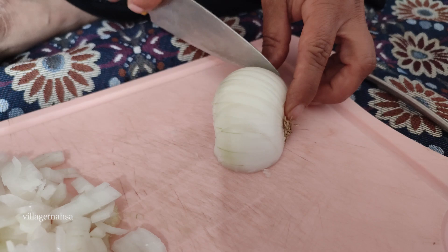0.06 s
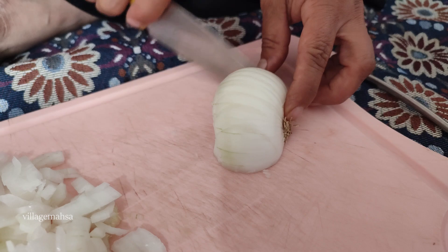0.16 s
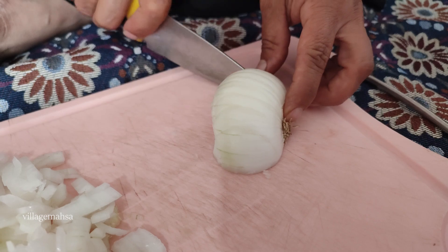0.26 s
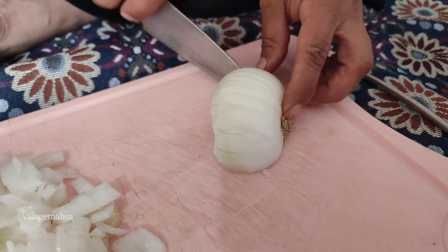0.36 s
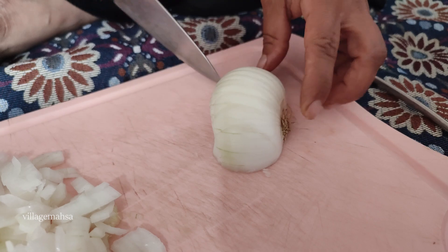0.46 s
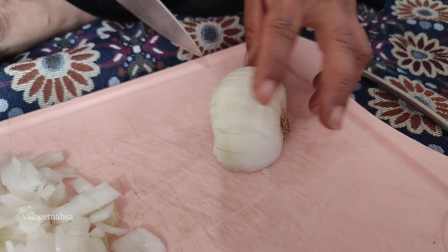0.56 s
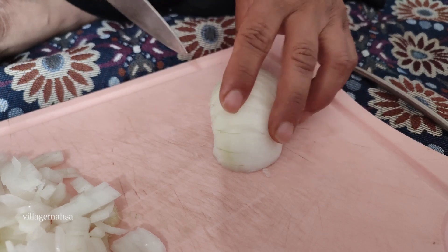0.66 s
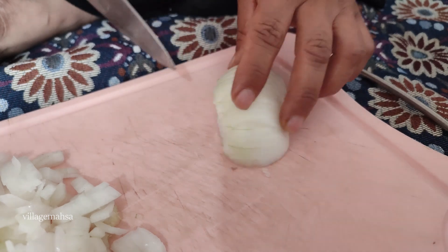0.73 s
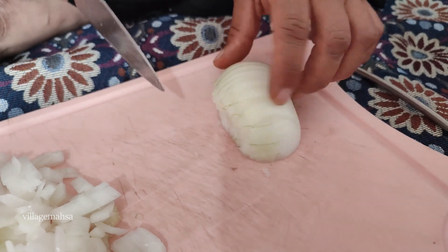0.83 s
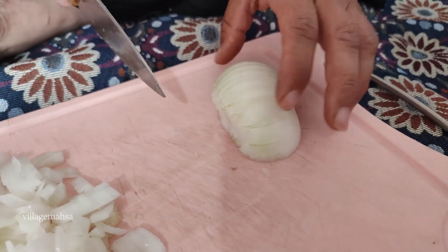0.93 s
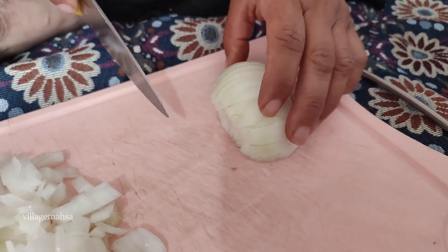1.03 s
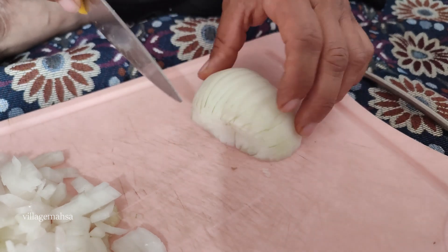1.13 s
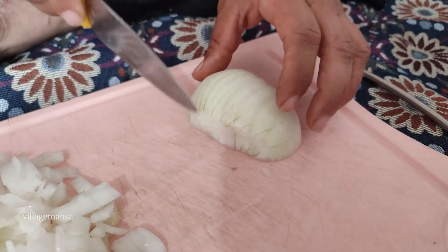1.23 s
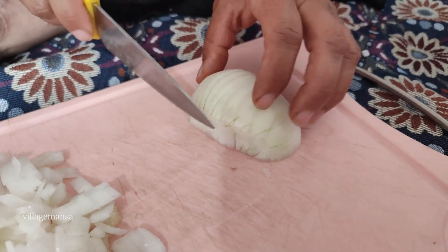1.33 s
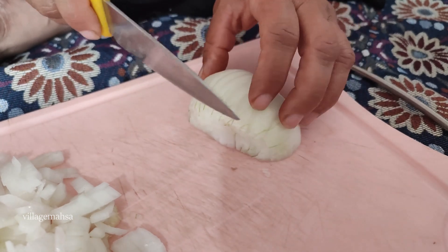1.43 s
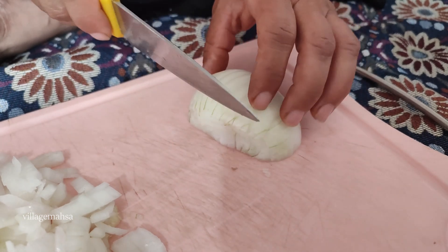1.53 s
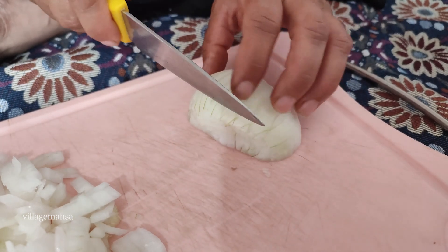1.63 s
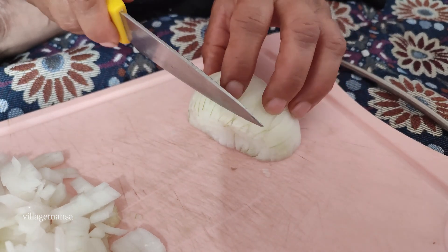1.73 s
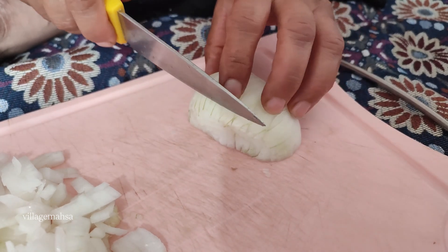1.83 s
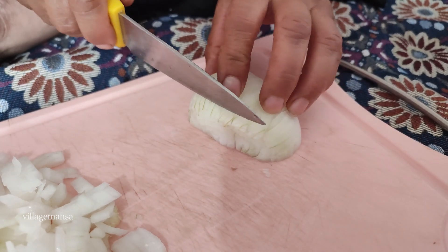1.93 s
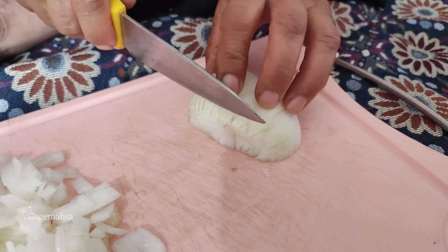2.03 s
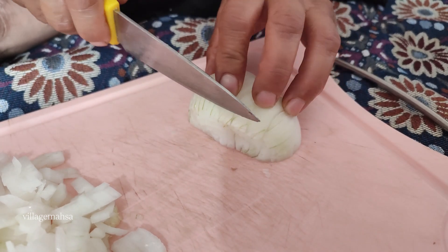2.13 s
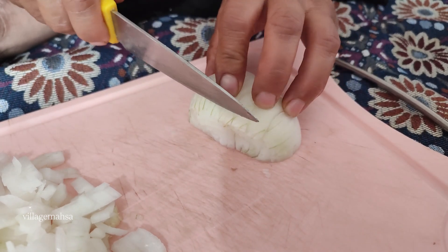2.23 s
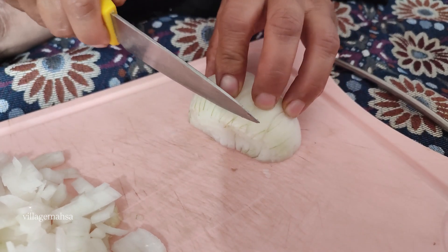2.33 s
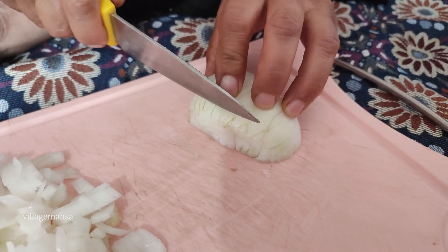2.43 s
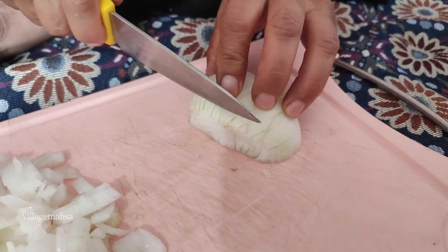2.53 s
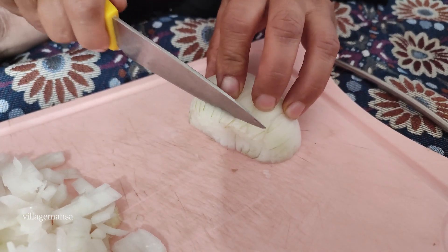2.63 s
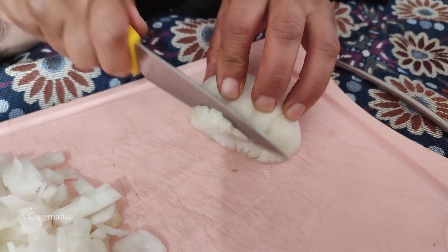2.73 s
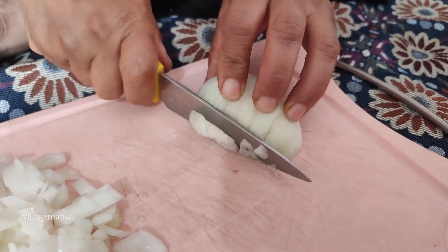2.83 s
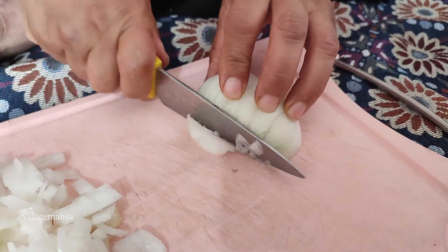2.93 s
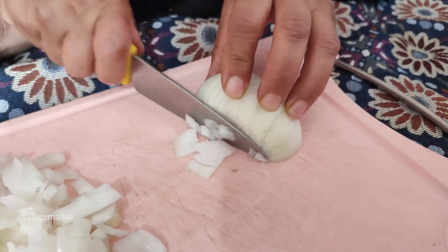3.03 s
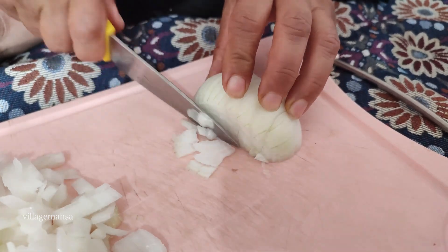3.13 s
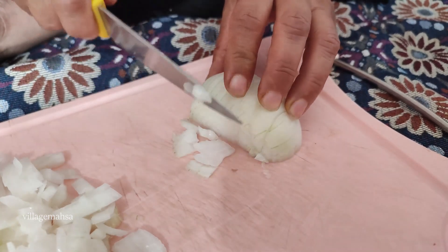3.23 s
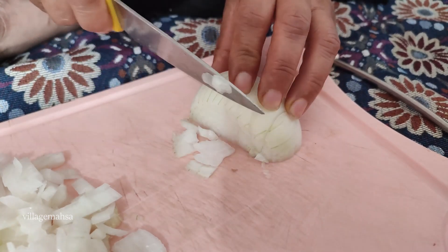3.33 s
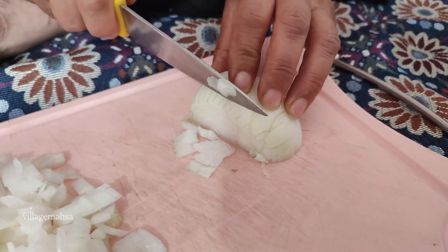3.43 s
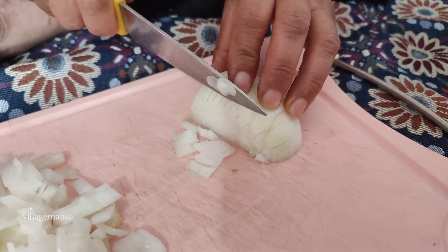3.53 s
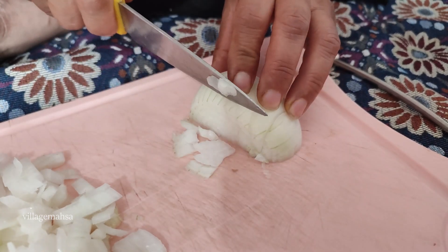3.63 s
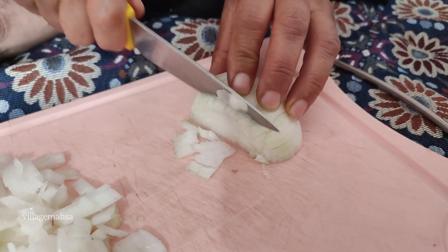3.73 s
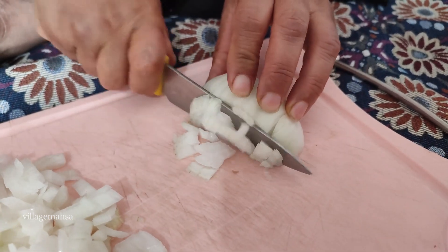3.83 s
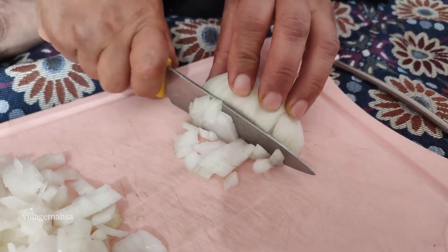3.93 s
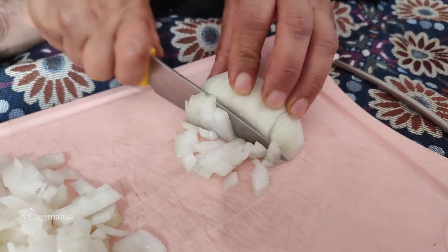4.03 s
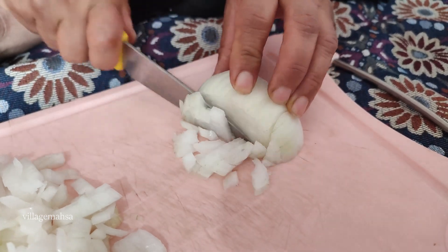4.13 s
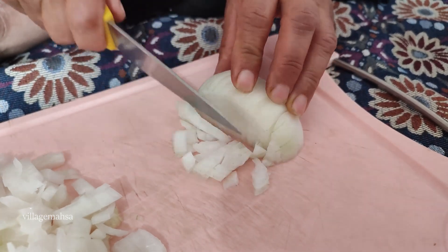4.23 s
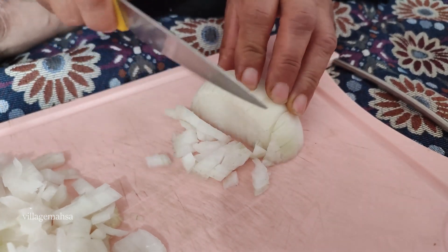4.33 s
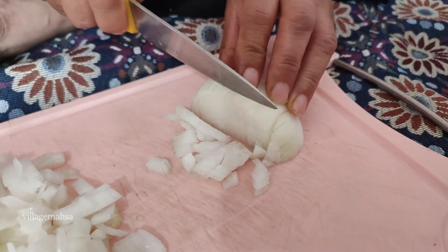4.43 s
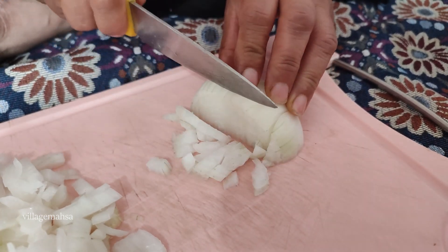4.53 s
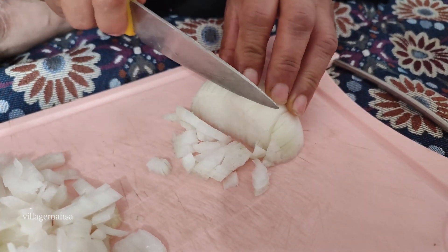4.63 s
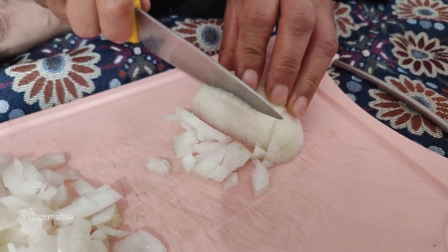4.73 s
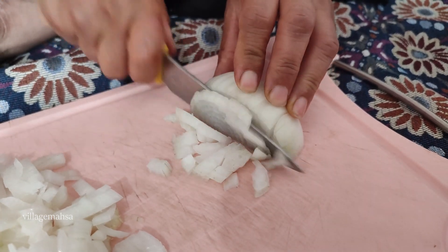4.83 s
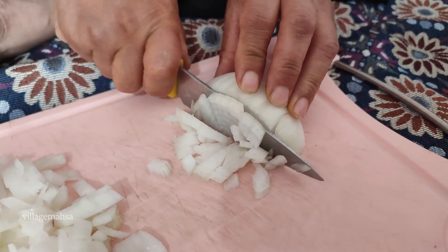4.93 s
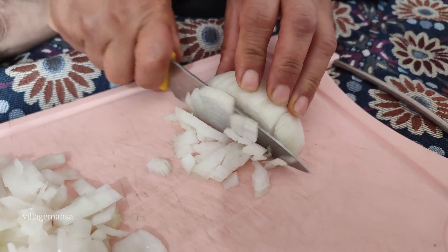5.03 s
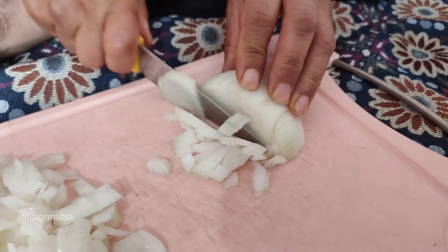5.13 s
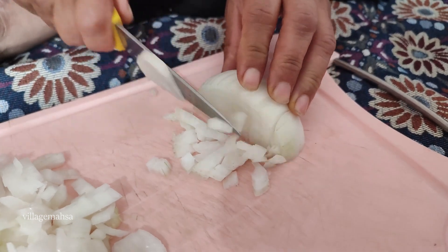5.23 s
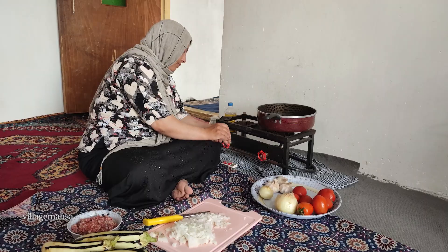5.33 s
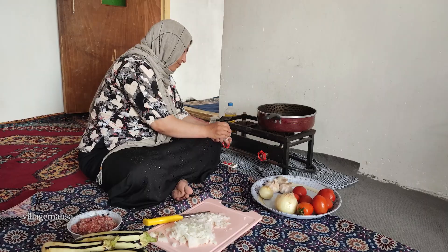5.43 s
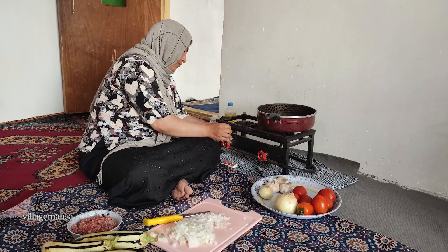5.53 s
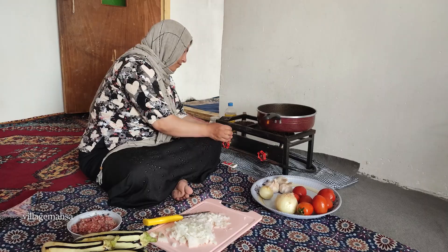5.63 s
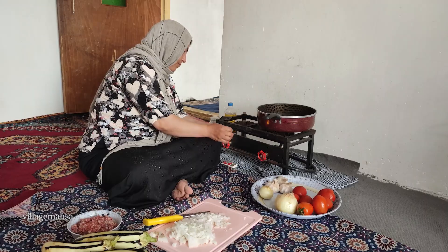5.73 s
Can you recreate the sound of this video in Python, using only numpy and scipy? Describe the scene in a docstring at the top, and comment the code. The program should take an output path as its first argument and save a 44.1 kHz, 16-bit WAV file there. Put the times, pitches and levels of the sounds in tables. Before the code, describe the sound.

Near phone pickup of onion dicing on a plastic board laid on carpet: one crackly cut and hard knock at once, a short drag of the blade, small thuds and ticks as the onion is turned, then near quiet. Three swelling crunches follow, each stopped by a solid knock, with wet slides as the blade withdraws. Short diffuse room echoes and a low airy rumble surround it.

```python
"""A kitchen knife dices an onion on a plastic board on a carpet, close to a phone in a small quiet room.
First a cut crunches (bursts of noise for cells) and ends in a knock (damped modes of board and blade).
The edge then drags over the board; fingers rub and turn the onion with small ticks and soft thuds.
From 2.6 s three more cuts follow about a second apart, each ending in a knock and a wet slide of the blade.
Air noise runs throughout; diffuse echoes follow every sound of the onion, knife and board."""
import sys
import numpy as np
from scipy import signal
from scipy.fft import rfft, irfft
from scipy.io import wavfile

SR = 44100
rng = np.random.default_rng(int(sys.argv[2]) if len(sys.argv) > 2 else 0)


def transcribe(signal):
    """Save signal, clipped to [-1, 1], as a 16-bit WAV file at the path in sys.argv[1]."""
    frames = np.atleast_2d(signal).T
    limited = np.clip(frames, -1, 1)
    pcm = np.round(limited * 32767).astype(np.int16)
    wavfile.write(sys.argv[1], SR, pcm)


N = 254443
T = np.arange(N) / SR  # s

# Room noise spectrum. Each row: frequency in Hz, relative level in dB.
AIR_SPECTRUM = [(6, 14), (22, 5.5), (40, 0.5), (131, -8.5), (153, -10.5), (231, -10.5), (308, -14.5),
                (490, -18), (618, -22), (801, -22), (1830, -27), (12700, -39), (14500, -34)]
# Wall echoes. Each row: frequency in Hz, reverberation time in s, echo level in dB.
ROOM_BANDS = [(116, 0.11, -14.5), (240, .42, -9), (406, 0.53, -15), (680, 0.34, -23), (1250, 0.23, -16),
              (2017, 0.23, -23), (2800, 0.24, -12.5), (3917, 0.17, -12), (5200, 0.15, -8),
              (7000, 0.27, -14), (10000, 0.24, -15.5), (13840, 0.19, -11)]
# Blade slides back along the wet cut face. Each row: start in s, end in s, mid-stroke level in dB.
BLADE_SLIDES = [(2.94, 3.17, -53), (3.99, 4.19, -52), (5.03, 5.225, -50.5)]
# Spectrum of that slide. Each row: frequency in Hz, relative level in dB.
SLIDE_SPECTRUM = [(120, -22), (200, -14.5), (375, -8.5), (402, -7), (608, -4.5), (1360, -10.5), (2170, 0),
                  (2590, -14.5), (3850, -9), (5410, -19), (7340, -9), (8320, -22.5), (10100, -26),
                  (12600, -15.5), (14500, -29)]
# Edge drags over the board. Each row: start in s, end in s, mid-stroke level in dB.
EDGE_SCRAPES = [(0.286, 0.385, -56), (0.385, 0.465, -49)]
# Spectrum of that drag. Each row: frequency in Hz, relative level in dB.
DRAG_SPECTRUM = [(88, -43.5), (150, -21), (256, -4.5), (667, -6), (1020, -20), (1460, -12.5), (4030, -21.5),
                 (5570, -30), (6750, -15), (8650, -36), (14500, -32.5)]
# Fingers rub and turn the onion. Each row: start in s, end in s, mid-stroke level in dB.
FINGER_RUBS = [(0.46, 0.727, -72), (0.729, 0.845, -60), (1.064, 1.122, -60), (1.12, 1.227, -76.5),
               (1.526, 1.669, -75.5), (1.914, 2.239, -76)]
# Spectrum of that rub. Each row: frequency in Hz, relative level in dB.
RUB_SPECTRUM = [(88, -22), (150, 2), (473, 0), (872, -15.5), (959, -21.5), (1980, -3), (2400, -7.5),
                (5260, -13.5), (6880, -4.5), (8490, -28), (12700, -9.5), (14500, -24.5)]
# Onion set down or pressed on the board. Each row: start in s, gain in dB before the envelope, pitch in Hz.
ONION_THUDS = [(0.018, -40, 210), (0.657, -41.5, 243), (1.023, -39, 240.2), (1.568, -52.5, 347.7),
               (1.641, -44.5, 179.9), (2.111, -50, 200.6), (2.303, -60.5, 499), (3.145, -44.5, 230),
               (3.419, -39, 164.3), (3.567, -49.5, 190), (4.198, -46.5, 232), (4.456, -36, 171.7),
               (5.218, -36.5, 218.8)]
# A layer gives way, or the edge first touches, with a crack and a jolt of the board.
# Each row: start in s, crack gain in dB, jolt gain in dB.
CRACKS = [(0.118, -47, -25), (0.1816, -31.5, -31.5), (0.287, -51, -40), (2.666, -48.5, -31),
          (3.687, -45, -42), (3.726, -43.5, -25), (3.816, -38.5, -26.5), (3.834, -38, -24.5),
          (4.714, -32, -24), (4.735, -35, -21), (4.7588, -38, -16)]
# Short ticks: crack of the first knock, fibres, wet skin, knife tip or nail.
# Each row: start in s, gain in dB, treble over body in dB.
SHORT_TICKS = [(0.201, -16, -27), (0.486, -49, -1), (0.563, -50.5, -2), (0.63, -43.5, -6),
               (0.662, -54.5, 10), (0.833, -49.5, 8), (1.0243, -42, -2), (1.1798, -44, -15),
               (1.4544, -47.5, -8), (1.6162, -50, -2.5), (1.957, -59.5, 14.5), (2.088, -52, -2),
               (2.1144, -40, -17), (2.234, -57, -1.5), (2.666, -43, 5), (2.681, -40, -13), (2.772, -24, -5),
               (3.676, -55.5, 9.5), (3.967, -44.5, -5), (5.0364, -57, 16.5)]
# Blade sinks through the onion. Each row: start in s, end in s, crunch gain at start in dB,
# crunch gain at end in dB, board rumble over crunch in dB.
CUT_STROKES = [(0, 0.176, -59, -59, 3.5), (0.081, 0.122, -55.5, -44.5, 0.5),
               (0.179, 0.2, -40.5, -43.5, -9.5), (2.608, 2.809, -63, -33, -0.5),
               (3.681, 3.845, -52.5, -31, 1), (4.765, 4.88, -42.5, -32.5, 3.5)]
# Spectrum of bursting cells. Each row: frequency in Hz, relative level in dB.
CRUNCH_SPECTRUM = [(410, -33.5), (700, -3), (847, -10), (914, -19), (1210, -9.5), (1320, -9.5), (1960, 0.5),
                   (2520, -6.5), (3130, -10.5), (4030, -3.5), (5190, -10.5), (7220, -1), (9070, -16.5),
                   (11800, -5), (14500, -8.5)]
# Spectrum of the shaken board. Each row: frequency in Hz, relative level in dB.
RUMBLE_SPECTRUM = [(41, -48.5), (70, -22), (124, -5), (216, 2.5), (296, -2), (552, -9), (732, -16),
                   (847, -13), (912, -19), (1210, -22), (1300, -26.5), (1690, -63.5), (2860, -120)]
# Edge or onion meets the board. Each row: start in s, push gain in dB, blade ring gain in dB,
# contact sharpness in Hz, board left minus right in dB, blade left minus right in dB.
BOARD_KNOCKS = [(0.182, 2.5, -9, 4520, -2, -1), (0.1987, 21.5, 0.5, 5480, 4, 5.5),
                (0.679, -17.5, 0.5, 3060, -4, 0), (1.0233, -14.5, -9, 5000, -4, 11),
                (2.806, 16, 1.5, 2168, -2, -6), (3.844, 21, 6, 2614, 3.5, -1),
                (4.8761, 19, 4.5, 2180, -4, -9.5), (5.2182, -10.5, -8, 2600, -3.5, -0.5)]
# Heavily damped board modes. Each row: frequency in Hz, width in Hz, left gain in dB, right gain in dB.
BOARD_MODES = [(228, 46, -3, -5), (364, 110, 1, -17.5), (533, 280, 0, 1), (638, 48, -1, -3.5),
               (841, 83, -12, -20), (1182.6, 190, -8, -6.5)]
# Heavily damped blade modes. Each row: frequency in Hz, width in Hz, left gain in dB, right gain in dB.
BLADE_MODES = [(1560, 420, -9, -6), (1940, 520, -11.5, 2.5), (2170, 63, -13.5, -12), (2990, 250, -4.5, -5),
               (3480, 430, -7.5, -12), (4040, 390, -13, 0.5), (6900, 2000, -18.5, -0.5)]

AIR_DB, HOLD_DB = -60, -80  # HOLD_DB: faint rustle of holding the onion
SLIDE_ARCH_DB, SCRAPE_ARCH_DB, RUB_ARCH_DB = 14.5, 1.5, 3  # mid-stroke over stroke ends
SLIDE_FADE_S, SCRAPE_FADE_S, RUB_FADE_S = 0.02, 0.0053, 0.013  # time constants outside a stroke
THUD_ATTACK_S, THUD_DECAY_S, JOLT_HZ = 0.0009, 0.0045, 222
CRACK_DECAY_S, CRACK_TREBLE_DB, TICK_DECAY_S = 0.0061, -8, 0.0013
STRAY_TICKS_PER_S, STRAY_TICK_DB, STRAY_SPREAD_DB, STRAY_TREBLE_DB = 5, -62.5, 1.5, 5.5
RUB_TICKS_PER_S = 26  # extra stray ticks while the fingers move
HANDLING_END_S = 5.3  # stray ticks stop, holding rustle starts to fade
BOUNCE_HZ, BOUNCE_WIDTH_HZ, BOUNCE_DB = 169, 45, -7  # loaded board rocks on the carpet; dB re its rumble
TOP_HZ = 14350


def undb(db):
    """Decibels to gain."""
    return 10 ** (np.asarray(db) / 20)


def on_log_axis(hz, points_hz, values):
    """Interpolate a table over log frequency."""
    return np.interp(np.log(np.maximum(hz, 1)), np.log(points_hz), values)


def pan(left_minus_right_db):
    """Channel gains for a left minus right level."""
    return undb(np.array([[left_minus_right_db], [-left_minus_right_db]]) / 2)


def add(out, start_s, sound):
    """Mix a short sound in at a time."""
    i = int(start_s * SR)
    out[..., i:i + sound.shape[-1]] += sound[..., :N - i]


def split(x, hz):
    """Parts of a sound below and above a frequency."""
    low = signal.sosfiltfilt(signal.butter(2, hz, fs=SR, output="sos"), x)
    return low, x - low


def walk(hz):
    """Random levels joined by straight lines, hz of them a second."""
    return np.interp(T * hz, np.arange(N), rng.standard_normal(N))


def late_right(x, count=4):
    """Sound reaches the right microphone count samples after the left."""
    return np.array([x[0], np.pad(x[1], (count, 0))[:N]])


def colour(x, spectrum, size=4096):
    """Minimum-phase filter of the given shape that keeps the power of white noise."""
    gain = undb(on_log_axis(np.fft.rfftfreq(size, 1 / SR), *np.transpose(spectrum)))
    cepstrum = irfft(np.log(gain))
    # keeping only the positive-time cepstrum makes the filter causal
    causal = 2 * cepstrum[:size // 2] * (np.arange(size // 2) > 0)
    response = irfft(np.exp(rfft(causal, size)))
    return signal.fftconvolve(x, response[None] / np.linalg.norm(response), axes=1)[:, :N]


def ring(x, modes, order=1):
    """Damped resonances with a gain per channel; at order 2 they swell before they fade."""
    out = 0
    for hz, width_hz, left_db, right_db in modes:
        sections = [np.concatenate(signal.iirpeak(hz, hz / width_hz, fs=SR))] * order
        out = out + undb([[left_db], [right_db]]) * signal.sosfilt(sections, x)
    return out


def grains(rate_per_s, spread_db, apart):
    """Unit-power random impulses of uneven size; a share (apart) differs between the channels."""
    unevenness = np.minimum(rng.exponential(size=N), 4)
    size = (rng.random(N) < rate_per_s / SR) * undb(spread_db * unevenness)
    shared = np.sqrt(1 - apart) * rng.choice([-1, 1], N)
    separate = np.sqrt(apart) * rng.standard_normal((2, N))
    x = size * (shared + separate)
    return x / x.std()


def strokes(rows, arch_db, fade_s):
    """Gain of sliding strokes that speed up towards their middle and slow down again."""
    out = np.zeros(N)
    for start_s, end_s, db in rows:
        place = np.clip(2 * (T - start_s) / (end_s - start_s) - 1, -1, 1)
        outside_s = np.maximum(np.maximum(start_s - T, T - end_s), 0)
        out += undb(db - arch_db * place ** 2) * np.exp(-outside_s / fade_s)
    return out


def air():
    """Steady hiss over a surging rumble; the channels are most alike in the middle of the range."""
    noise = rng.standard_normal((3, N))
    hz = np.fft.rfftfreq(N, 1 / SR)
    alike = on_log_axis(hz, [25, 80, 500, 3000], [0.2, 0.31, 0.57, 0.035])
    field = irfft(np.sqrt(alike) * rfft(noise[2]) + np.sqrt(1 - alike) * rfft(noise[:2]), N)
    rumble, hiss = split(colour(field, AIR_SPECTRUM) * undb(AIR_DB), hz=120.4)
    return hiss + rumble * undb(2 * walk(hz=13))


def room(x):
    """Diffuse wall echoes start a few milliseconds late and decay exponentially band by band."""
    t = T[:SR * 3 // 4]
    hz = np.fft.rfftfreq(2 * len(t), 1 / SR)
    centres_hz = [row[0] for row in ROOM_BANDS]
    noise = rng.standard_normal((3, 2 * len(t)))
    shared = 1 / (1 + (hz / 1100) ** 2)  # long waves reach both microphones alike
    field = np.sqrt(shared) * rfft(noise[2]) + np.sqrt(1 - shared) * rfft(noise[:2])
    onset = np.clip((t - 0.004) / 0.0063, 0, 1)
    response = 0
    for weights, (_, t60_s, db) in zip(np.eye(len(ROOM_BANDS)), ROOM_BANDS):
        fade = onset * np.exp(-np.log(1000) * t / t60_s)
        band = irfft(field * on_log_axis(hz, centres_hz, weights))[:, :len(t)]
        response = response + undb(db) * band * fade / np.linalg.norm(fade)
    source = 0.47 * x[0] + 0.47 * x[1]
    return signal.fftconvolve(source[None], response, axes=1)[:, :N]


def friction():
    """Dense little slips of steel on onion and on plastic, and sparser ones of onion on skin."""
    wet_slips = grains(rate_per_s=6000, spread_db=2.5, apart=0.35)
    edge_slips = grains(rate_per_s=3500, spread_db=2.5, apart=0.35)
    slide = strokes(BLADE_SLIDES, SLIDE_ARCH_DB, SLIDE_FADE_S) * colour(wet_slips, SLIDE_SPECTRUM)
    drag = strokes(EDGE_SCRAPES, SCRAPE_ARCH_DB, SCRAPE_FADE_S) * colour(edge_slips, DRAG_SPECTRUM)
    holding = undb(HOLD_DB) * np.clip((HANDLING_END_S - T) / 0.068 + 1, 0, 1)
    fingers = strokes(FINGER_RUBS, RUB_ARCH_DB, RUB_FADE_S) + holding
    skin = colour(grains(rate_per_s=1300, spread_db=-1.5, apart=1.0), RUB_SPECTRUM)
    # wet skin also sticks and lets go in lone ticks
    ticks = undb(-7.5) * colour(grains(rate_per_s=30, spread_db=-1, apart=0.409), CRUNCH_SPECTRUM)
    grip = undb(0.68 * walk(hz=80))
    return grip * (slide * pan(-7.5) + drag * pan(-4.5) + fingers * (skin + ticks) * pan(-5.5))


def thuds():
    """The board bounces on the carpet in short damped sines at each onion thud and each crack."""
    out = np.zeros(N)
    t = T[:SR // 8]
    fade = (1 - np.exp(-t / THUD_ATTACK_S)) * np.exp(-t / THUD_DECAY_S)
    jolts = [(start_s, jolt_db, JOLT_HZ) for start_s, _, jolt_db in CRACKS]
    for start_s, db, hz in list(ONION_THUDS) + jolts:
        add(out, start_s, undb(db) * fade * np.sin(2 * np.pi * hz * t))
    return out * pan(1.5)


def snaps():
    """Clusters of tiny bursts with an exponential decay: longer for cracks, short for set and random ticks."""
    bursts = colour(grains(rate_per_s=13000, spread_db=0.5, apart=0.36), CRUNCH_SPECTRUM)
    low, high = split(bursts * pan(-11), hz=4960)
    clusters = [(start_s, db, CRACK_TREBLE_DB, CRACK_DECAY_S) for start_s, db, _ in CRACKS]
    clusters += [(start_s, db, treble_db, TICK_DECAY_S) for start_s, db, treble_db in SHORT_TICKS]
    chance, size = rng.random(N), rng.standard_normal(N)
    moving = sum((T > start_s) & (T < end_s) for start_s, end_s, _ in FINGER_RUBS)
    rate_per_s = STRAY_TICKS_PER_S * (T < HANDLING_END_S) + RUB_TICKS_PER_S * moving
    for i in np.flatnonzero(chance < rate_per_s / SR):
        stray_db = STRAY_TICK_DB + STRAY_SPREAD_DB * size[i]
        clusters.append((T[i], stray_db, STRAY_TREBLE_DB, TICK_DECAY_S))
    body, treble = np.zeros(N), np.zeros(N)
    t = T[:SR // 10]
    onset = 1 - np.exp(-t / 0.0003)
    for start_s, db, treble_db, decay_s in clusters:
        burst = undb(db) * onset * np.exp(-t / decay_s)
        add(body, start_s, burst)
        add(treble, start_s, burst * undb(treble_db))
    return body * low + treble * high


def cuts():
    """Cells burst as the blade sinks, mostly ever louder; the jerky load shakes and rocks the board."""
    force, load = np.zeros(N), np.zeros(N)
    for start_s, end_s, first_db, last_db, rumble_db in CUT_STROKES:
        depth = np.clip((T - start_s) / (end_s - start_s), 0, 1)
        # length of edge inside the round onion grows fast at first, then levels off
        db = last_db + (first_db - last_db) * (1 - depth) ** 1.3
        attack = np.clip((T - start_s) / 0.009, 0, 1)
        release = np.exp(-np.maximum(T - end_s, 0) / 0.002)
        stroke = undb(db) * attack * release
        force += stroke
        load += stroke * undb(rumble_db)
    # layer after layer resists and gives way
    jerk = undb(2.3 * walk(hz=300))
    # sparse tearing fibres below, countless small cells in the treble
    fibres = grains(rate_per_s=2500, spread_db=2.5, apart=0.4)
    cells = grains(rate_per_s=12000, spread_db=2.5, apart=0.65)
    tearing = jerk * split(fibres, hz=5030)[0] + np.sqrt(jerk) * split(cells, hz=4430)[1]
    shakes = grains(rate_per_s=1500, spread_db=1, apart=0.03)
    rocking = ring(rng.standard_normal(N), [(BOUNCE_HZ, BOUNCE_WIDTH_HZ, 0, 0)])
    rumble = colour(load * jerk * shakes, RUMBLE_SPECTRUM)
    board = rumble + undb(BOUNCE_DB) * load * rocking / rocking.std()
    return colour(force * tearing, CRUNCH_SPECTRUM) * pan(-8) + board * pan(1)


def knocks(size=4096):
    """A short push rings the board at once and the blade with a swell; both are heavily damped."""
    out = np.zeros((2, N))
    for start_s, db, blade_db, sharp_hz, board_pan_db, blade_pan_db in BOARD_KNOCKS:
        push = signal.lfilter(*signal.butter(3, sharp_hz, fs=SR), signal.unit_impulse(size))
        board = pan(board_pan_db) * ring(push, BOARD_MODES)
        blade = undb(blade_db) * pan(blade_pan_db) * ring(push, BLADE_MODES, order=2)
        add(out, start_s, -undb(db) * (board + blade))
    # a small board radiates little deep bass
    return signal.lfilter(*signal.butter(2, 95, "high", fs=SR), out)


def scene():
    """Blows on the board, crunch and friction above it, and the room around them."""
    near = late_right(knocks() + thuds()) + late_right(cuts() + snaps() + friction(), count=1)
    return near + room(near) + air()


def record(dry):
    """The phone rounds the highest peaks and cuts the top."""
    rounded = dry / (1 + (dry / 0.86) ** 8) ** 0.125
    return signal.sosfilt(signal.ellip(12, 0.2, 80, TOP_HZ, fs=SR, output="sos"), rounded)


dry = scene()
out = record(dry)
transcribe(out)
```